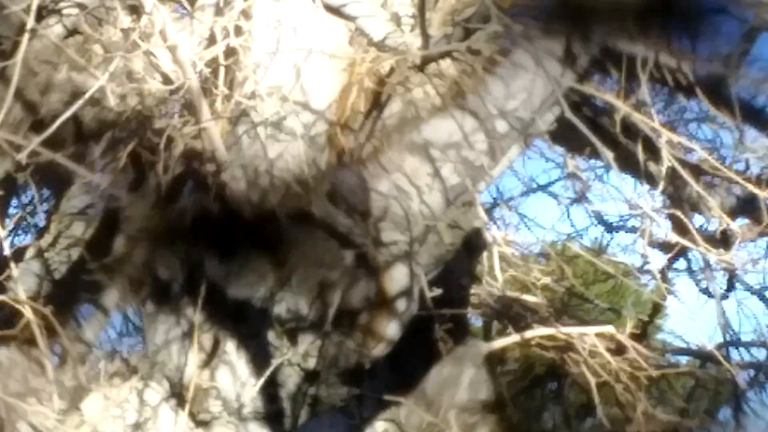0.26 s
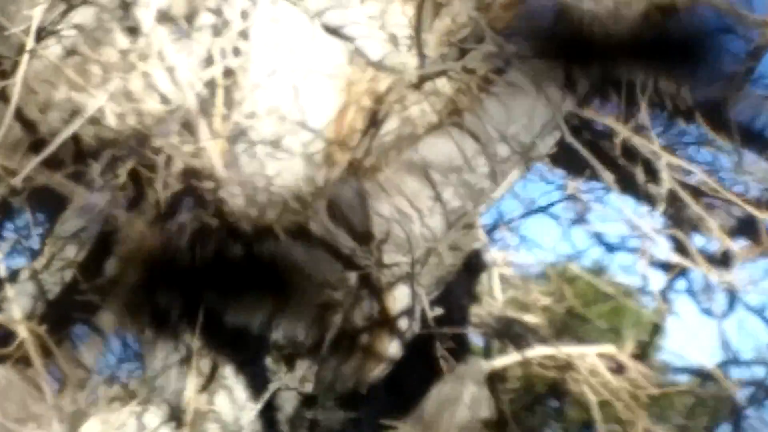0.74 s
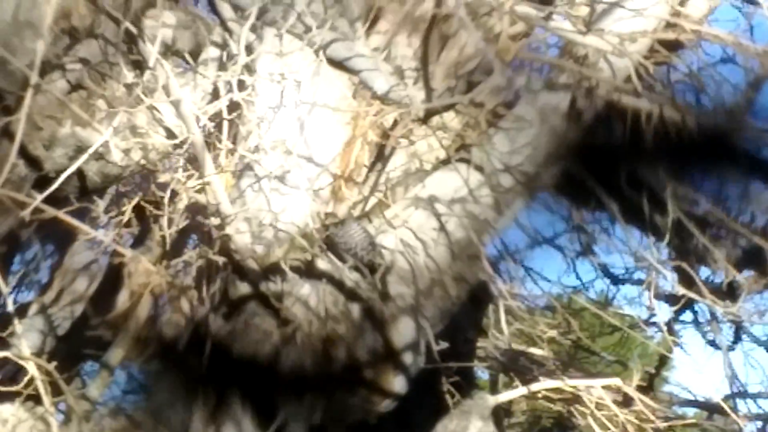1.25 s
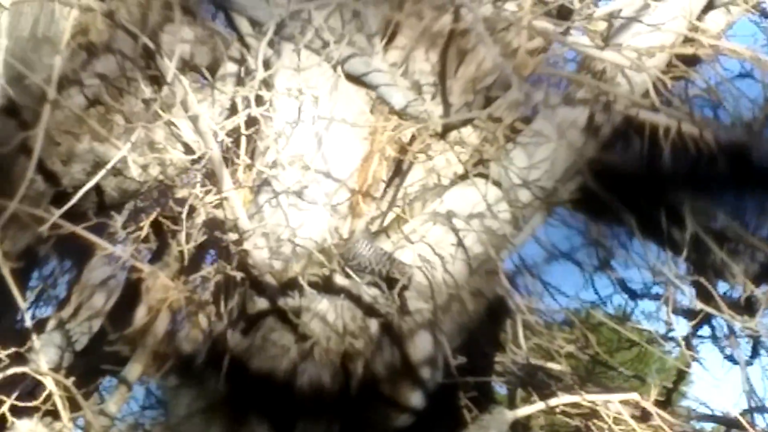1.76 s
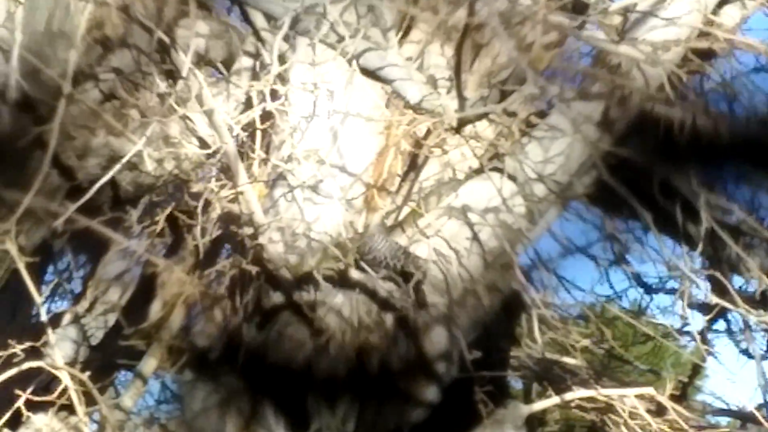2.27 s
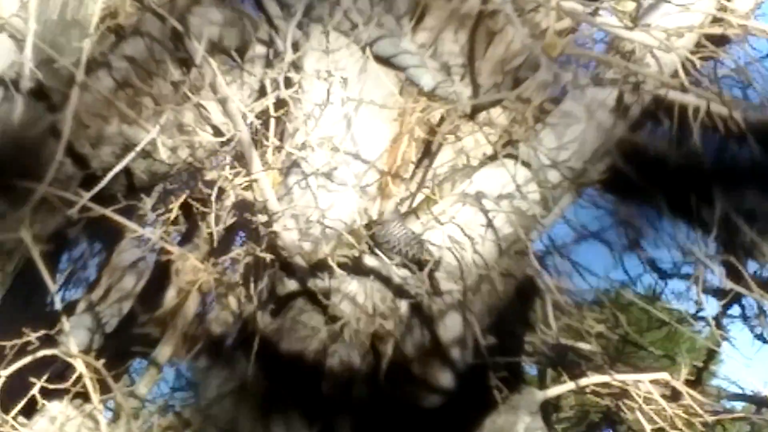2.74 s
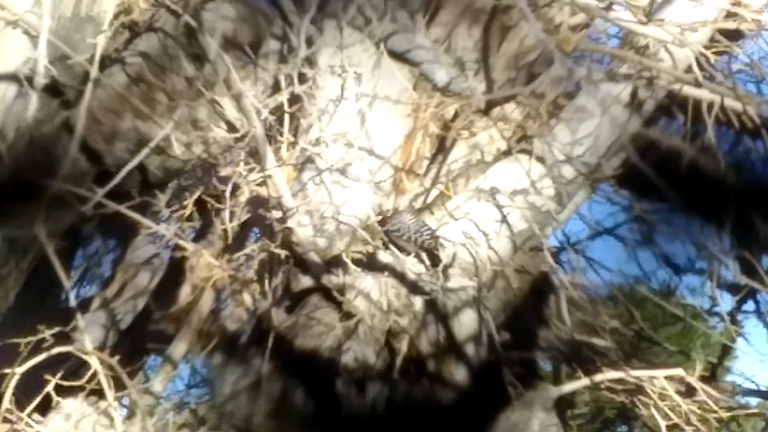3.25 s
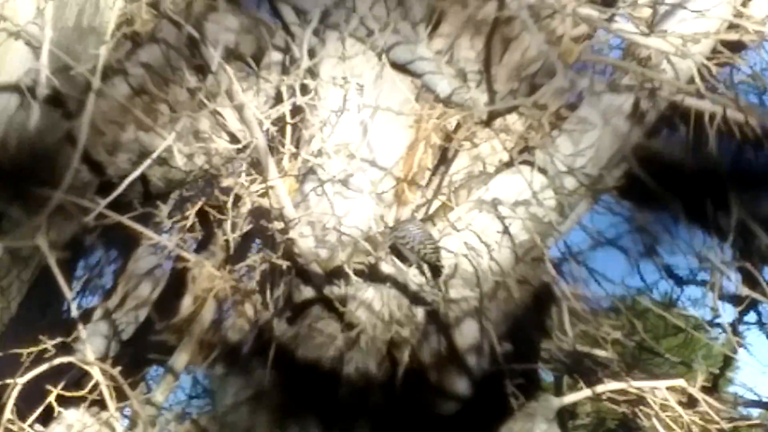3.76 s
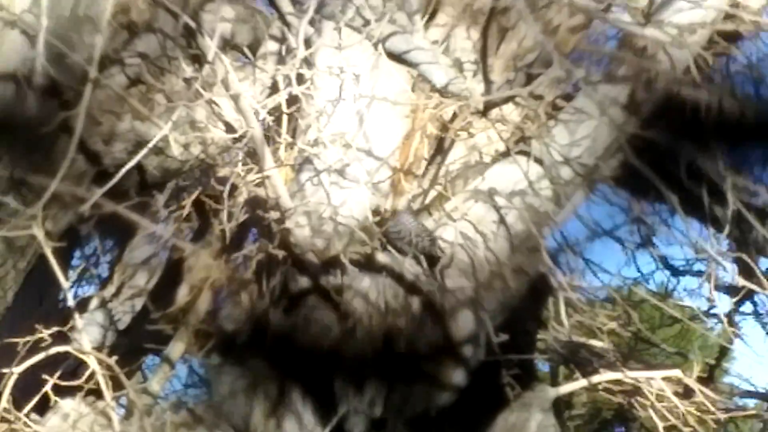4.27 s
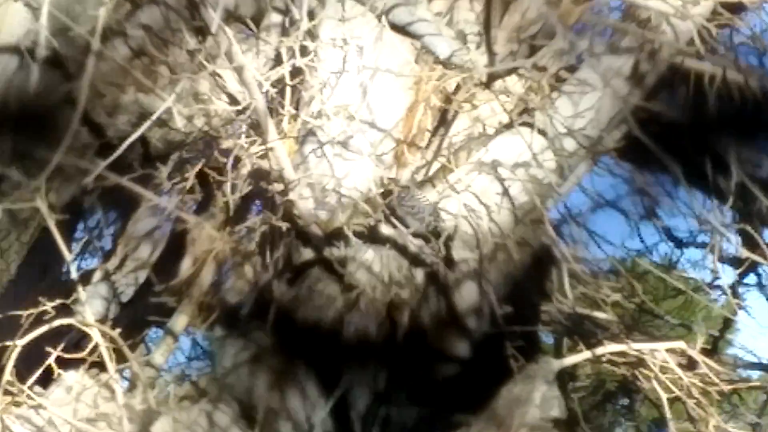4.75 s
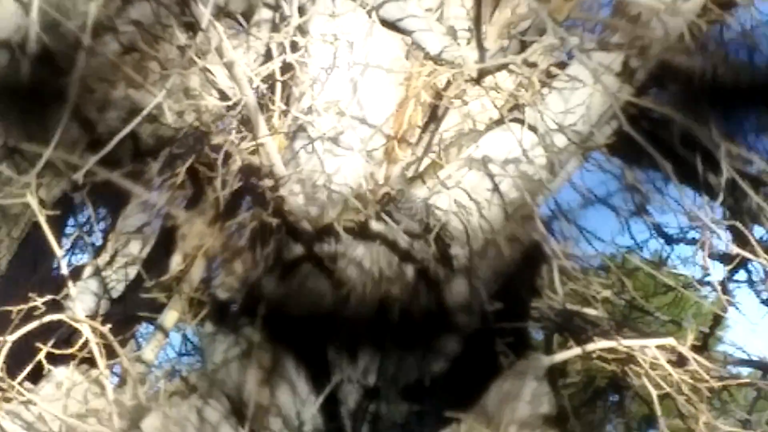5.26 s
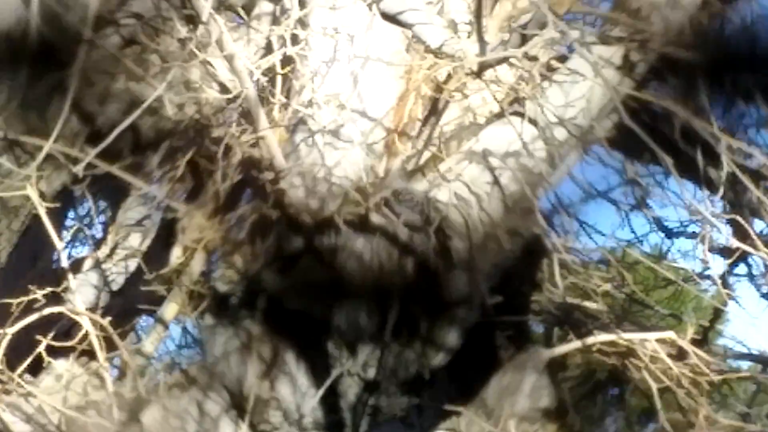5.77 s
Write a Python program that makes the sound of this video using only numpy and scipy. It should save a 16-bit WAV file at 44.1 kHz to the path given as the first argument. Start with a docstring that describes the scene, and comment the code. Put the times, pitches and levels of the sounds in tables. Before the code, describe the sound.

A songbird opens with a quick string of short, high, sliding chirps while a woodpecker taps irregularly on a tree limb. Dry clicks sound close to the microphone, with one louder sharp knock a little before the middle. Faint falling calls come from farther off. The songbird gives a brief flurry, then a longer run near the end. A quiet outdoor wash lies underneath.

```python
"""Songbird and woodpecker in a bare tree

A songbird warbles in short gliding notes that scatter off the limbs of a big bare tree, while a
woodpecker pecks the wood. Sharp dry clicks and one loud knock sit right up front. Behind them are
far calls, a few faint hoots and wisps of hiss, over a quiet outdoor wash and a thin steady hum."""
import sys
import numpy as np
from scipy import signal
from scipy.fft import rfft, irfft
from scipy.io import wavfile
from scipy.ndimage import uniform_filter1d

SR = 44100
rng = np.random.default_rng(int(sys.argv[2]) if len(sys.argv) > 2 else 0)


def dump_mix(stems):
    """Bounce the given channels to the path in sys.argv[1] as a 16-bit WAV at rate SR."""
    frames = np.atleast_2d(stems).T  # one column per channel
    limited = np.clip(frames, -1, 1)  # hard clip at full scale
    pcm = np.round(limited * 32767).astype(np.int16)
    wavfile.write(sys.argv[1], SR, pcm)


N = 265173


def amp(db):
    return 10 ** (np.asarray(db) / 20)


def unit_rms(x):
    return x / np.sqrt(np.mean(x ** 2) + 1e-20)


def eq_curve(points, hz):
    """Gain in dB at hz, with the points joined by straight lines on a log-frequency axis."""
    points_hz, gain_db = np.transpose(points)
    return np.interp(np.log(hz + 1), np.log(points_hz + 1), gain_db)


def add(mix, start_s, sound):
    """Drop a sound into the mix, trimming whatever overhangs."""
    start = round(start_s * SR)
    sound = sound[max(-start, 0):]
    part = mix[max(start, 0):][:len(sound)]
    part += sound[:len(part)]


def drift(size, hz):
    """Smooth random modulation, rms about 1, rolling off above hz."""
    noise = rng.standard_normal(size + SR // 4)
    lowpass = np.exp(-(np.fft.rfftfreq(len(noise), 1 / SR) / hz) ** 2)
    return unit_rms(irfft(rfft(noise) * lowpass))[:size]


def ease(u):
    """A smooth step from 0 to 1."""
    return np.sin(np.pi / 2 * u) ** 2


def envelope(db):
    """A level curve as a gain with soft ends."""
    return amp(db) * signal.windows.tukey(len(db), 0.15)


def scatter(x, t60_s, onset_s):
    """Echoes off limbs and ground: sparse taps that build over onset_s and die away."""
    t = np.arange(SR) / SR
    taps = rng.choice([-1., 1.], SR) * (rng.random(SR) < 2000 / SR)  # about 2000 a second
    taps *= amp(-60 * t / t60_s) * (1 - np.exp(-(t / onset_s) ** 2))
    return signal.fftconvolve(x, taps / np.linalg.norm(taps))[:len(x)]


def whistle(pitch, waver, waver_hz, flutter_db, overtone_db, sweep_hz_per_s):
    """A nearly pure tone: cleanest while held, trembling where the pitch sweeps, hoarse when high."""
    size = len(pitch)
    unrest = 0.25 + np.tanh(abs(np.gradient(pitch)) * SR / sweep_hz_per_s)
    wavering_pitch = pitch * (1 + waver * unrest * drift(size, waver_hz))
    phase = 2 * np.pi * np.cumsum(wavering_pitch) / SR
    # straining for high notes turns part of the tone into a skirt of noise
    hoarse = np.interp(pitch, [3100, 4200], [0, 0.13])
    tone = np.sqrt(1 - hoarse) * np.sin(phase) + np.sqrt(hoarse) * drift(size, hz=557) * np.cos(phase)
    tone += amp(overtone_db) * np.sin(2 * phase)
    return np.sqrt(2) * amp(flutter_db * unrest * drift(size, waver_hz)) * tone


def noise_band(pitch, width_hz):
    """A band of noise that tracks a pitch curve."""
    phase = 2 * np.pi * np.cumsum(pitch) / SR
    size, half_hz = len(pitch), width_hz / 2
    return unit_rms(drift(size, half_hz) * np.cos(phase) + drift(size, half_hz) * np.sin(phase))


# The songbird's chirps, each a slur into a crest and away. Rasp is relative to the tone.
# crest_s, lead_s, tail_s, start_hz, crest_hz, end_hz, level_db, rasp_db, tail_end_db
CHIRPS = [(0.012, 0.03, 0.041, 3450, 3240, 3214, -37.5, -5, -10),
          (0.09, 0.0079, 0.028, 2880, 3030, 2790, -48.0, -19, -1),
          (0.135, 0.015, 0.015, 2980, 3190, 3040, -37, -20, -11),
          (0.236, 0.034, 0.023, 3070, 3060, 2990, -39.5, -27, -8),
          (0.262, 0.01, 0.048, 3020, 2936, 1843, -44.5, -11, -13.5),
          (0.451, 0.053, 0.028, 2800, 3380, 2960, -43.5, -4, -18),
          (0.558, 0.021, 0.032, 2920, 3080, 2740, -49.5, -27, -9),
          (0.601, 0.052, 0.0086, 2830, 3100, 3040, -43, -21, -15),
          (0.716, 0.048, 0.073, 3070, 3020, 1780, -45, -22, -17),
          (0.81, 0.05, 0.075, 3000, 2986, 3500, -54, -3, -11),
          (0.904, 0.027, 0.032, 3330, 3194, 3710, -41.5, -8, -14),
          (0.987, 0.012, 0.032, 2780, 3000, 2910, -56.0, -1.5, 0),
          (1.04, 0.058, 0.023, 4380, 4026, 3470, -50.5, -21, -3),
          (1.051, 0.019, 0.019, 3710, 3120, 2820, -42.5, -21, -12),
          (1.082, 0.008, 0.025, 3090, 3330, 3590, -45.5, -11, -17),
          (2.922, 0.037, 0.02, 4700, 5470, 5430, -47, -7, -16),
          (2.925, 0.026, 0.0066, 2480, 2760, 3020, -53.5, -12, -2),
          (2.941, 0.011, 0.014, 3020, 3970, 5020, -38, -14, -4.5),
          (2.961, 0.017, 0.026, 5010, 3790, 3230, -38, -15, -14.5),
          (2.988, 0.02, 0.018, 5200, 4700, 4400, -52, 3, -7),
          (3.003, 0.019, 0.014, 3390, 3390, 3480, -44, -6, -4),
          (3.027, 0.016, 0.034, 3336, 3860, 2890, -43, -7, -16),
          (4.945, 0.041, 0.041, 3450, 4390, 3050, -54, -4, -2),
          (5.056, 0.028, 0.06, 4380, 4390, 3330, -47, -12, -8.5),
          (5.108, 0.025, 0.01, 3540, 3800, 3920, -49, -4, -14),
          (5.187, 0.024, 0.08, 3830, 3717, 3580, -50, -27, -14.5),
          (5.28, 0.017, 0.012, 2980, 3360, 4090, -48.5, -7, -9),
          (5.298, 0.017, 0.044, 4250, 4205, 3220, -45.5, -13, -5.5),
          (5.399, 0.043, 0.044, 3700, 3120, 2495, -44, -5, -14),
          (5.553, 0.054, 0.035, 3955, 4356, 3520, -44.0, 0, 0.5),
          (5.562, 0.045, 0.018, 4610, 5300, 5700, -53, 1.5, -11),
          (5.584, 0.048, 0.013, 2150, 3840, 4040, -46, -8, -5),
          (5.598, 0.037, 0.066, 3580, 4427, 4000, -39, -26, -10.5),
          (5.605, 0.031, 0.054, 4190, 3860, 3400, -38.5, -25, -6),
          (5.707, 0.027, 0.01, 3750, 3184, 2900, -40, -25, -18),
          (5.739, 0.044, 0.011, 3490, 4000, 3850, -46.0, -12, -16),
          (5.74, 0.023, 0.022, 2754, 3270, 3430, -41, -20, -10),
          (5.828, 0.013, 0.047, 3700, 4180, 3860, -40.5, -16, -17),
          (5.863, 0.025, 0.019, 3760, 3520, 3310, -44, -26, 0.5),
          (5.919, 0.013, 0.034, 4520, 4540, 3990, -55.5, -19, 3),
          (5.945, 0.032, 0.025, 5030, 5010, 4990, -54, -23, -9),
          (5.964, 0.029, 0.034, 3890, 3790, 3700, -44.5, -22, -20)]


def chirps():
    """Notes swell as they slide to a crest and mostly fade as they slur away; rasp rides on the pitch."""
    out = np.zeros(N)
    swell_from_db = -15
    for crest_s, lead_s, tail_s, start_hz, crest_hz, end_hz, level_db, rasp_db, tail_end_db in CHIRPS:
        t = np.arange(-lead_s, tail_s, 1 / SR)
        before, after = np.maximum(-t / lead_s, 0), np.maximum(t / tail_s, 0)
        pitch = crest_hz + (start_hz - crest_hz) * ease(before) + (end_hz - crest_hz) * ease(after)
        tone = whistle(pitch, waver=0.033, waver_hz=500, flutter_db=2.6,
                       overtone_db=-40, sweep_hz_per_s=35000)
        rasp = amp(rasp_db) * noise_band(pitch, width_hz=1600)
        gain = envelope(level_db + swell_from_db * before + tail_end_db * after)
        add(out, crest_s - lead_s, gain * (tone + rasp))
    return out


# Far calls, often a high one answered by a low one.
# start_s, length_s, top_hz, level_db
FAR_CALLS = [(1.18, .045, 3600, -67), (1.405, .04, 3400, -66), (1.556, .042, 4300, -51),
             (1.61, .04, 3280, -55.5), (1.688, 0.025, 4000, -62.5), (1.783, 0.041, 3250, -63),
             (1.902, .035, 3100, -76), (2.012, 0.036, 4050, -69), (2.067, 0.047, 3270, -64),
             (2.229, 0.036, 4360, -63.5), (2.271, .035, 3150, -62.5), (2.438, 0.045, 4210, -58.5),
             (2.494, 0.046, 3250, -64), (2.634, 0.039, 3190, -62), (3.493, 0.04, 4360, -52.5),
             (3.546, .04, 3290, -60), (4.351, 0.039, 4280, -57), (4.41, 0.036, 3400, -61),
             (4.774, 0.04, 4390, -59.5)]


def far_calls():
    """Short hoarse slurs that all fall by the same interval and peak late."""
    out = np.zeros(N)
    drop_octaves, drop_curve = 0.303, 1.496
    for start_s, length_s, top_hz, level_db in FAR_CALLS:
        progress = np.arange(0, length_s, 1 / SR) / length_s
        pitch = top_hz * 2 ** (-drop_octaves * progress ** drop_curve)
        tone = whistle(pitch, waver=0.045, waver_hz=500, flutter_db=2.5,
                       overtone_db=-40, sweep_hz_per_s=18000)
        arch_db = np.interp(progress, [0, 0.77, 1], [-5.5, 0, -5.5])
        add(out, start_s, tone * envelope(level_db + arch_db))
    return out


def birdsong():
    """Calls arrive straight and by way of the branches; the far ones are wetter, with a longer tail."""
    near, far = chirps(), far_calls()
    near_echo = amp(-6.5) * scatter(near, t60_s=0.17, onset_s=0.0054)
    far_echo = amp(-4.5) * scatter(far, t60_s=0.31, onset_s=0.006)
    return amp(-2) * (near + far) + near_echo + far_echo


# The woody ring of the limb.
# pitch_hz, gain_db, t60_s
LIMB_MODES = [(740, -25, 0.049), (1060, 2, 0.016), (1151, -3.5, 0.032), (1420, -45, 0.04),
              (1990, -5, 0.018), (2247, 0.5, 0.023), (2870, -1.5, 0.015), (3650, -9.5, 0.051),
              (4230, -3, 0.0089)]
# Blows of the woodpecker's bill on the bark.
# start_s, level_db, tilt_db_per_octave
PECKS = [(0.0175, -29.5, -5), (.507, -46, 0), (1.012, -51.5, 4), (1.11, -55, -22), (1.218, -57, 2),
         (1.3278, -30, -5), (2.0072, -53.5, 4.5), (3.119, -46.5, -2.5), (4.522, -36.5, -8.5),
         (5.383, -55, 0), (5.749, -47.5, -16)]


def pecks():
    """Each blow rings the limb briefly, a little differently from spot to spot, and crunches the bark."""
    out, t = np.zeros(N), np.arange(SR // 10) / SR
    attack = 1 - np.exp(-t / 0.00062)
    tilt_pivot_hz = LIMB_MODES[2][0]
    crunch_hz, crunch_db, crunch_t60_s = 1900, -11, 0.07
    detunes = 1 + 0.034 * rng.standard_normal((len(PECKS), len(LIMB_MODES)))
    for (start_s, level_db, tilt), spot_detunes in zip(PECKS, detunes):
        for (pitch_hz, gain_db, t60_s), detune in zip(LIMB_MODES, spot_detunes):
            mode_db = level_db + gain_db + tilt * np.log2(pitch_hz / tilt_pivot_hz)
            ring = np.sin(2 * np.pi * pitch_hz * detune * t)
            add(out, start_s, amp(mode_db - 60 * t / t60_s) * attack * ring)
        crunch = drift(len(t), hz=850) * np.cos(2 * np.pi * crunch_hz * t)
        add(out, start_s, amp(level_db + crunch_db - 60 * t / crunch_t60_s) * crunch)
    return out + amp(-6.5) * scatter(out, t60_s=0.097, onset_s=0.0022)


# The colour all the knocks share.
# frequency_hz, gain_db
KNOCK_EQ = [(50, -17), (250, 4), (750, 3), (1100, -3), (1900, -8), (2450, -13), (3000, -5), (4500, 2.5),
            (5500, -2.5), (8300, -25), (11000, -3.5), (14500, -9), (16000, -11.5)]
# Where thud, body, clack, snap and fizz sit.
# frequency_hz
KNOCK_BANDS_HZ = [250, 1000, 2000, 4500, 11000]
# Knocks and clicks, mostly close but one far bang with a long tail, each with its own five-band colour on top
# of the shared one. # start_s, thud_db, body_db, clack_db, snap_db, fizz_db, echo_send_db, rebound_db
KNOCKS = [(0.678, -12, -4.5, -22, -50, -60, -30, -37), (.747, -23.5, 3, -6, -25, -46, -4, -26),
          (1.497, -25, -29, -22, -22.5, -48, 1.5, 1), (2.16, -16, -7, -5.5, -11.5, -33, -35, 3.5),
          (2.4189, -8, 13, 13.5, 21, 0, -50, -35), (2.693, -10, -4, -5, -17.5, -40, -31, -8),
          (4.4587, -1.5, -10.5, 3.5, -3.5, -28, -44, -4), (5.197, -2, -19, -4.5, -32, -60, -37, -20),
          (5.594, -8.5, -35, -32, -33, -58, -22, -20)]


def knocks():
    """A damped, coloured impulse with a rebound a moment later; some raise an outdoor echo."""
    direct, echo_send = np.zeros(N), np.zeros(N)
    hz = abs(np.fft.fftfreq(4096, 1 / SR))
    rebound_s = 0.001006
    for start_s, *bands_db, echo_send_db, rebound_db in KNOCKS:
        own_eq = list(zip(KNOCK_BANDS_HZ, bands_db))
        gain = amp(eq_curve(KNOCK_EQ, hz) + eq_curve(own_eq, hz))
        # minimum phase packs the energy at the front for a hard attack
        spectrum = np.exp(np.conj(signal.hilbert(np.log(gain))))
        click = np.fft.ifft(spectrum).real[:len(hz) // 2]
        add(direct, start_s, click)
        add(direct, start_s + rebound_s, amp(rebound_db) * click)
        add(echo_send, start_s, amp(echo_send_db) * click)
    return direct + scatter(echo_send, t60_s=0.795, onset_s=0.0043)


# Faint far hoots.
# start_s, length_s, pitch_hz, rise_octaves, level_db
HOOTS = [(1.79, 0.12, 220.2, 0.2, -53.5), (2.015, 0.18, 372, 0.36, -56.5), (3.875, .09, 467, 0.072, -59),
         (4.015, 0.088, 449, 0.012, -53)]


def hoots():
    """Low notes that swell and fade on a slow upward glide, blurred by distance."""
    voice = np.zeros(N)
    for start_s, length_s, pitch_hz, rise_octaves, level_db in HOOTS:
        progress = np.arange(0, length_s, 1 / SR) / length_s
        pitch = pitch_hz * 2 ** (rise_octaves * progress)
        tone = whistle(pitch, waver=0.045, waver_hz=45, flutter_db=3,
                       overtone_db=-20, sweep_hz_per_s=600)
        arch_db = -5 * (2 * progress - 1) ** 2
        add(voice, start_s, tone * envelope(level_db + arch_db))
    return amp(-2) * voice + amp(-6) * scatter(voice, t60_s=0.84, onset_s=0.0075)


# Faint wisps of high hiss.
# start_s, length_s, centre_hz, width_hz, level_db
HISSES = [(0.917, 0.046, 6400, 1600, -63), (0.925, 0.087, 7150, 700, -67.5),
          (0.92, 0.039, 9600, 1200, -73.5), (0.978, 0.032, 9800, 1000, -74),
          (2.347, 0.027, 6460, 6030, -65.5), (2.895, 0.071, 10800, 1400, -72)]


def hisses():
    """Short swells of band noise with a little echo."""
    out = np.zeros(N)
    for start_s, length_s, centre_hz, width_hz, level_db in HISSES:
        size = int(length_s * SR)
        band = noise_band(np.full(size, centre_hz), width_hz)
        add(out, start_s, amp(level_db) * band * signal.windows.tukey(size, 0.8))
    return out + amp(-10) * scatter(out, t60_s=0.18, onset_s=0.016)


def wash(eq, patchy_db, wobble_db):
    """Coloured noise with patches drifting through its spectrum and a gently wobbling level."""
    hz, _, spectrogram = signal.stft(rng.standard_normal(N), SR, nperseg=2048)
    patches = uniform_filter1d(rng.standard_normal(spectrogram.shape), size=16, axis=0)  # in frequency
    patches = unit_rms(uniform_filter1d(patches, size=5, axis=1))  # in time
    spectrogram *= amp(eq_curve(eq, hz)[:, None] + patchy_db * patches)
    noise = signal.istft(spectrogram, SR, nperseg=2048)[1][:N]
    return unit_rms(noise) * amp(wobble_db * drift(N, hz=6.64))


# The colours of the outdoor bed, low layer and high layer.
# frequency_hz, relative_db
RUMBLE_EQ = [(20, -33), (40, -13), (75, -1), (170, 0), (230, -6), (350, -9.5), (600, -12.5), (900, -16.5),
             (1500, -25.5), (4000, -87)]
AIR_EQ = [(200, -9.5), (600, -0.5), (1000, -2), (1400, -.5), (2000, -1.5), (3200, -2), (4300, -4.5),
          (5500, -7.5), (6500, -11), (8000, -17.5), (11000, -20), (14500, -23), (16000, -18)]
# The bed's fader ride: a late swell, with a brief dip just after a click.
# time_s, gain_db
BED_RIDE = [(0, 0), (4.7, -0.5), (4.85, 3), (5.19, 2), (5.215, -14), (5.27, -3), (5.4, 2), (5.9, 1.5)]


def outdoor_bed():
    """Distant rumble and airy hiss; lows and mids swell and dip while the top stays steady."""
    rumble = amp(-60.5) * wash(RUMBLE_EQ, patchy_db=1.0, wobble_db=0.6)
    air = amp(-63) * wash(AIR_EQ, patchy_db=1.65, wobble_db=0.5)
    crossover_hz = 3013
    low_air = signal.filtfilt(*signal.butter(2, crossover_hz, fs=SR), air)
    high_air = air - low_air
    ride = amp(np.interp(np.arange(N) / SR, *np.transpose(BED_RIDE)))
    return (rumble + low_air) * ride + high_air


# The partials of the thin hum.
# pitch_hz, rms_db
HUM_PARTIALS = [(118, -75), (177.6, -71.5), (258, -70.5), (295, -73), (354, -76), (411, -82), (942, -68.5),
                (1297, -80.5)]


def hum():
    """Held sine tones, each wandering slightly in level and phase."""
    out, t = np.zeros(N), np.arange(N) / SR
    for pitch_hz, rms_db in HUM_PARTIALS:
        gain = np.sqrt(2) * amp(rms_db + 0.79 * drift(N, hz=12))
        out += gain * np.sin(2 * np.pi * pitch_hz * t + 0.84 * drift(N, hz=1.86))
    return out


def scene():
    """All the layers in one mono mix."""
    return (birdsong() + pecks() + knocks() + hoots() + hisses() + outdoor_bed() + hum())[None]


# The bands where the recorder's filters ring.
# centre_hz, width_hz
RECORDER_RINGS = [(4000, 170), (4000, 330), (4000, 1300), (12250, 730)]


def record(dry):
    """All-pass filters hold back a few bands, so clicks leave a brief ping; a low-pass trims the top."""
    rung = dry
    for centre_hz, width_hz in RECORDER_RINGS:
        radius = np.exp(-np.pi * width_hz / SR)
        feedback = np.array([1, -2 * radius * np.cos(2 * np.pi * centre_hz / SR), radius ** 2])
        rung = signal.lfilter(feedback[::-1], feedback, rung)
    lowpass = signal.firwin(127, cutoff=15900, window=("kaiser", 9), fs=SR)
    return signal.oaconvolve(rung, lowpass[None], "same")


dry = scene()
out = record(dry)
dump_mix(out)
```